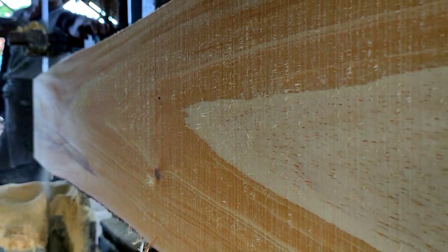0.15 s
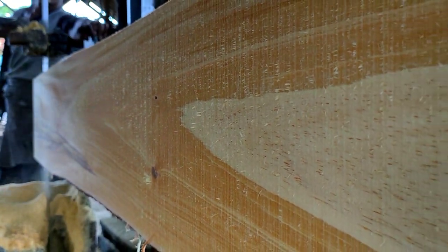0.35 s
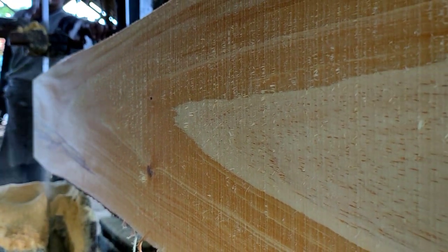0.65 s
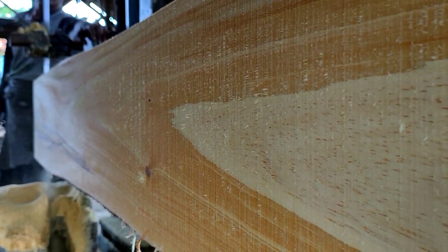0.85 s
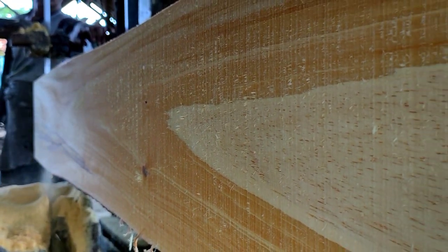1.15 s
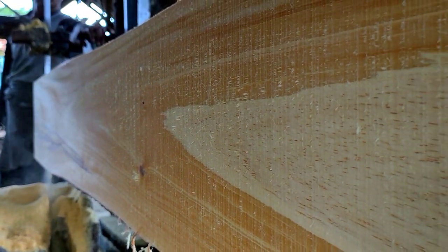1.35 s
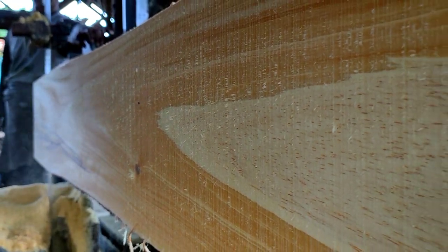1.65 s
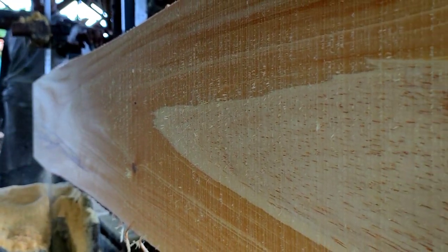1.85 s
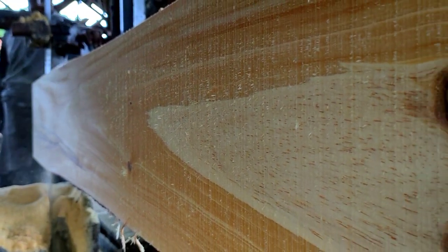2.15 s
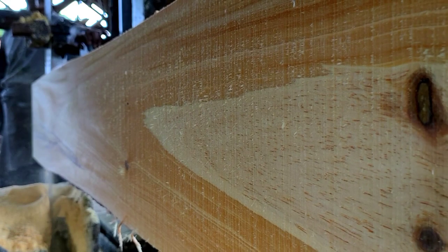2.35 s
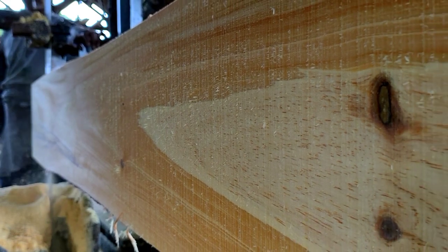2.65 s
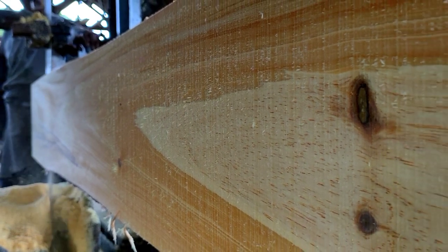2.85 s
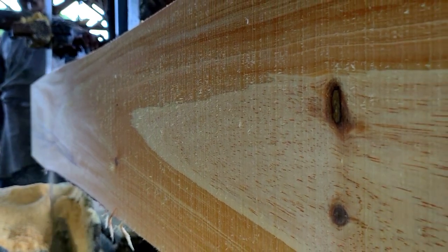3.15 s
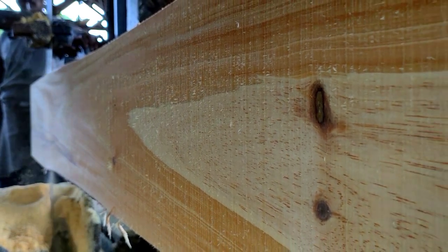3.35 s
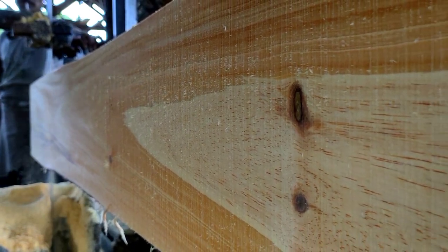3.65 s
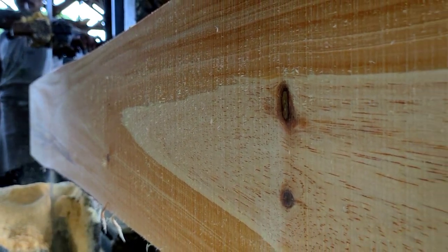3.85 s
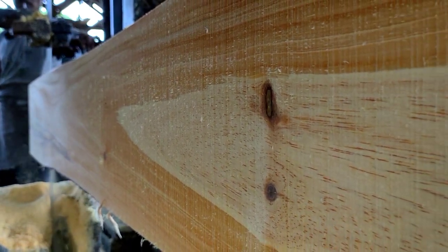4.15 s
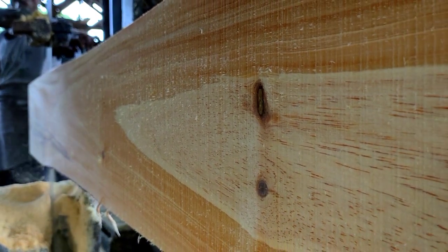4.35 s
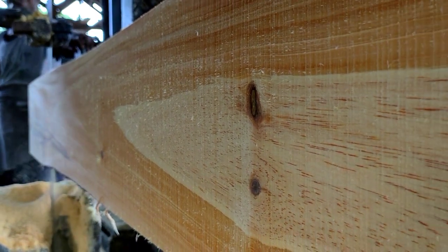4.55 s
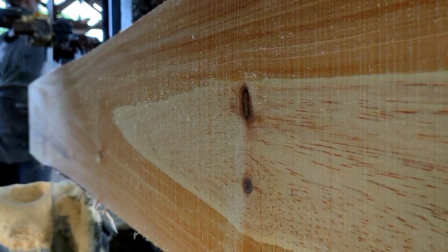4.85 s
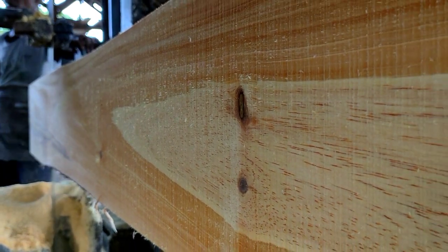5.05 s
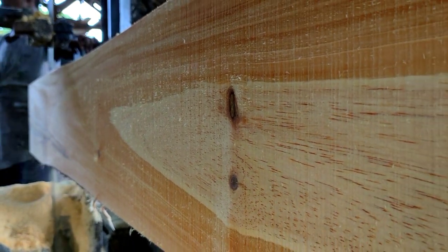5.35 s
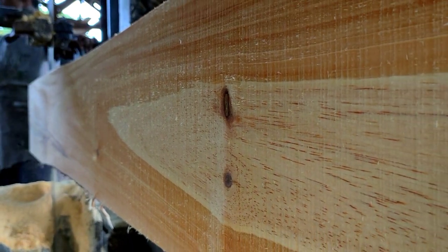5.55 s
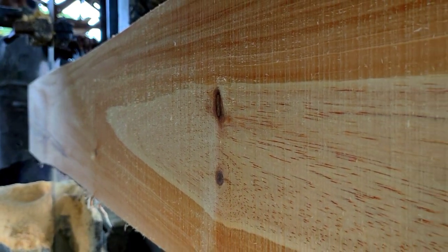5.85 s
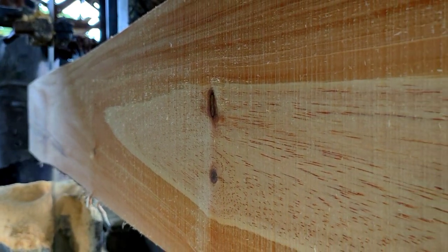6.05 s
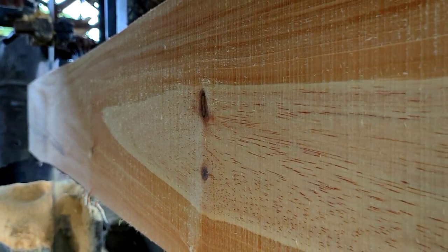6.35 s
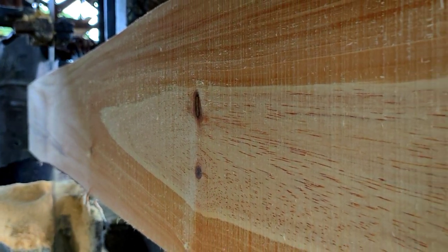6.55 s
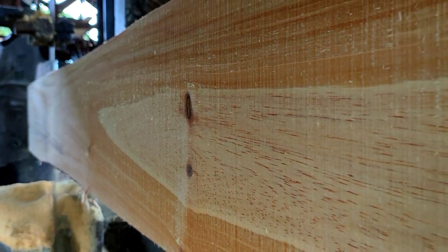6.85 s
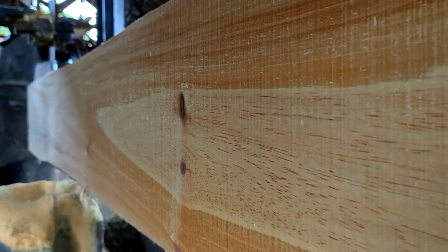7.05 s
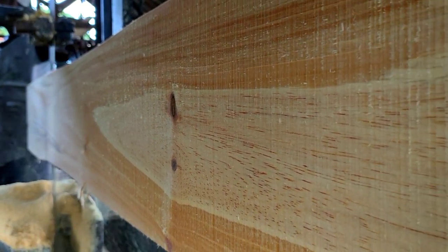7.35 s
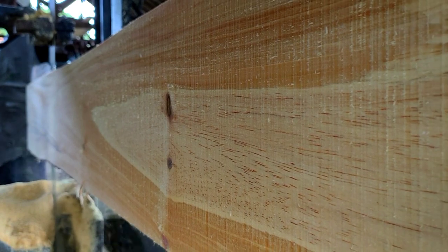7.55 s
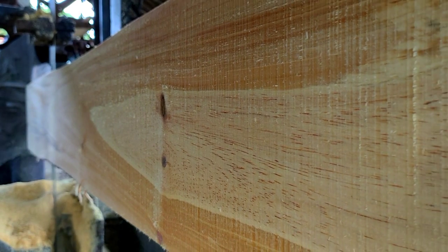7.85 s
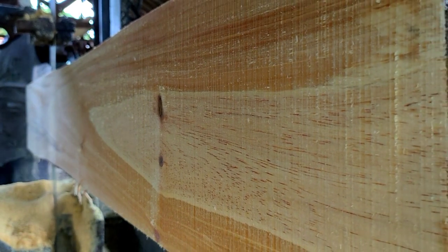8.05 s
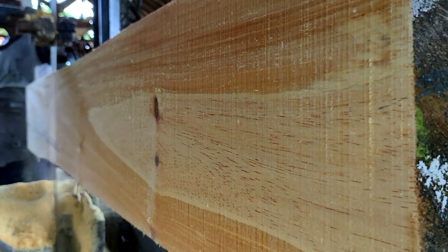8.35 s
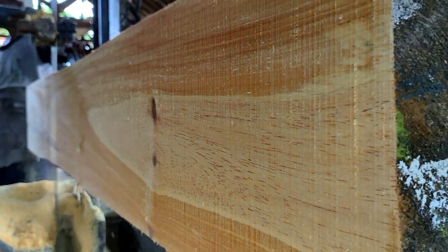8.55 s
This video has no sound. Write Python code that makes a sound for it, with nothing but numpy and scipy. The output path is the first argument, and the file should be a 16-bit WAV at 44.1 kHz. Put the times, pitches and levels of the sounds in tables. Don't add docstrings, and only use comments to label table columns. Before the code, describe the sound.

The machine is already running at 0 s and continues unbroken to the end at about 8.7 s. A one-cylinder engine fires nearly fourteen times a second: a low, boomy exhaust pop and frame thuds, with bursts of metallic clatter, short pings and ringing cover plates in every cycle. Over this lies the constant dry hiss of teeth tearing wood. During the first three seconds the load comes on: flying dust fizzes more, the knocks near each pop grow sharper, and the beat sags, easing to just above twelve per second by the end. A thin high whine appears briefly around 1 and 2.5 s, then about 4 s; a lower tooth tone swells near 3.4 s, strongest around 5.4 s, faint at 7.6 s. From 3 to 7 s some hard pops make the level dip momentarily. Close stereo microphones in an open shed, muffled treble, patchy suppressed highs.

```python
import sys
import numpy as np
from scipy import signal
from scipy.fft import rfft, irfft, next_fast_len
from scipy.io import wavfile
from scipy.ndimage import uniform_filter1d

SR = 44100
rng = np.random.default_rng(int(sys.argv[2]) if len(sys.argv) > 2 else 0)


def to_wav(sig):
    pcm = np.clip(np.atleast_2d(sig), -1, 1) * 32767
    pcm = np.round(pcm).astype(np.int16)
    wavfile.write(sys.argv[1], SR, pcm.T)


def voltage_ratio(decibels):
    exponent = np.asarray(decibels, float) / 20
    return 10 ** exponent


N = 383669

# (time [s], firing rate [1/s])
ENGINE_SPEED = [(0, 13.6887), (.7, 13.3733), (1.8, 13.1165), (3.3, 12.8299), (5, 12.6156), (6.5, 12.4591),
                (7.7, 12.2989), (8.7, 12.2994)]
# (time [s], teeth passing [per cycle])
TEETH_PER_CYCLE = [(0, 40.62), (8.7, 39.9)]
EXHAUST_PUSHES = [((1, 2), .956, .956, -1), ((3, 5, 7), .03, .028, -1), ((4, 6, 8), -.02, .009, -1),
                  ((9, 10, 16), .01, .007, -1), ((11,), .02, .02, 1), ((12, 13, 14, 15), .633, .628, 1),
                  ((17, 18, 19), .177, .177, 1), ((20, 21), .452, .44, 1), ((22, 23, 24), .445, .443, 1),
                  ((25,), .602, .592, 1), (range(26, 31), .587, .59, 1)]
# (multiple of firing rate, level [dB rms])
EXHAUST_TONES = [(1, -58.6), (2, -39.8), (3, -48.9), (4, -40.8), (5, -36.6), (6, -36.3), (7, -30.5),
                 (8, -26.4), (9, -34.4), (10, -33.0), (11, -38.1), (12, -30.5), (13, -37.2), (14, -50.1),
                 (15, -33.5), (16, -38.4), (17, -41.5), (18, -37.6), (19, -39.3), (20, -43.1), (21, -41.6),
                 (22, -44.1), (23, -43.4), (24, -51.8), (25, -52.7), (26, -50.5), (27, -49.9), (28, -54.3),
                 (29, -58.8), (30, -54.1)]
# (frequency [Hz], half width [Hz], gain [dB])
STANDING_WAVES = [(67.1, 3.0, -7.7), (92.6, 5.4, -10.1), (104.2, 3.6, -13.9), (137.3, 3.7, -15.6),
                  (175.1, 3.0, -4.0), (207.8, 9.2, -11.6), (229.8, 3.0, -7.5), (256.6, 4.7, 5.3),
                  (281.6, 8.9, -13.9), (325.3, 25.0, 13.5), (342.2, 10.0, -13.5), (371.0, 25.0, 2.7)]
# (frequency [Hz], level [dB per Hz])
BLOWN_AIR = [(15, -20), (30, -4), (60, -2), (190, 0), (250, 3), (340, 0), (450, -8), (800, -40)]
# (place [cycle 0-1], rise [s], time to fall 60 dB [s])
CLATTER_STROKES = [
    (.68, .002, .03),
    (.69, .003, .26),
    (.83, .002, .05),
    (.96, .002, .038),
    (.98, .003, .26),
    (.962, .0015, .028),
]
# (light load [dB], full load [dB], centre [Hz], fall [dB per octave squared])
STROKE_COLOURS = [
    (-31, -31.5, 2500, 1.2),
    (-32.5, -29.5, 2300, 1.1),
    (-33.5, -33, 1800, 1.5),
    (-37, -21.5, 3200, .8),
    (-41, -32, 3600, 0.8),
    (-33, -29, 1500, 2.5),
]
# (frequency [Hz], time to fall 60 dB [s], left [dB], right [dB], stroke that strikes it [index])
COVER_PLATES = [(727, .05, -48, -44, 0), (735, .09, -44, -39, 2), (727, .14, -48, -44, 3),
                (835, .05, -47, -44, 2), (635, .3, -52, -46, 0), (3230, .028, -44, -46, 3),
                (1600, .03, -49, -52, 3), (2000, .04, -46, -54, 0), (748, .06, -56, -42, 0),
                (785, .06, -49, -43, 2), (420, .06, -50, -50, 2)]
# (place [cycle 0-1], frequency [Hz], light load peak [dB], full load peak [dB], left minus right [dB])
METAL_PINGS = [(.685, 740, -23, -24, -4), (.69, 1000, -27, -28, -3), (.69, 2230, -27, -27.5, -8),
               (.69, 1550, -28, -34, 4), (.735, 1400, -33, -24, 2), (.78, 2900, -27, -30, 2),
               (.835, 738, -24, -23, -3), (.925, 745, -23, -24, -7), (.97, 1560, -32, -23, 4),
               (.96, 3260, -34, -21, 2), (.99, 3020, -25, -25, 0), (.13, 1620, -36, -28, 0),
               (.13, 3200, -36, -28, 0), (.70, 5200, -36, -35, 0)]
# (frequency [Hz], level [dB per Hz])
CUT_COLOUR = [(380, -2.5), (640, -2), (900, -2.1), (1250, -2), (1700, -2.6), (2150, -0.5), (2700, -3),
              (3250, -0.7)]
# (tooth tone [dB], octave [dB])
WHINE_REST_DB = (-51, -55)
# (middle [s], half length [s], octave up [0 or 1], rise [dB])
BLADE_SINGS = [
    (3.4, 1, 0, 8),
    (5.4, 1.1, 0, 11),
    (7.6, 1, 0, 5),
    (1.1, .6, 1, 13),
    (1.9, .4, 1, 3),
    (2.5, .5, 1, 10.5),
    (4.2, 1.1, 1, 9),
]
# (frequency [Hz], share [0-1])
COMMON_LOW = [(100, 1), (330, 0.91), (420, 0.32), (500, 1), (660, .1), (1050, 0.098), (1220, 0.57),
              (1650, 0.56)]
# (frequency [Hz], share [0-1])
COMMON_HIGH = [(1800, 0.25), (2500, 0.09), (2900, 0.27), (3300, 0.39), (3500, 0.28), (5000, 0.074),
               (15000, 0.081)]
# (frequency [Hz], left minus right [dB])
LEFT_RIGHT = [(160, 0), (450, 0.5), (740, -1.5), (1220, 0), (2010, 1.5), (5500, -1), (9080, 2.5),
              (15000, -1.5)]
# (frequency [Hz], gain [dB])
MIC_TREBLE = [(3250, -1), (4700, -4), (4900, -10), (5200, -8), (6500, -16), (8000, -25), (11000, -27.5),
              (15000, -59)]
# (time [s], depth [dB])
LIMITER_DUCKS = [
    (3.21, 1.5),
    (3.6, 2),
    (4.385, 3.5),
    (4.94, 3),
    (5.66, 3),
    (6.61, 3),
    (7.02, 2.5),
    (7.26, 2),
]
# (frequency [Hz], how much weak sound sinks [power], # how rarely a wide patch drops out
THINNING = [(380, 0, 4, 4), (600, .15, 1.6, 1.8), (1250, .25, 1.25, 1.5), (1700, .25, 1.9, 1.8),
            (4750, .3, 1.9, 1.7), (5000, 1, 1, .5), (8000, 1.2, 1.3, .3), (15000, 1.4, 1, .1)]

FIRST_TURN = -.268
LAG_S = 20 / SR
LOAD_FROM_S, LOAD_RISE_S, LOAD_BEND = 0.24, 2.53, 1.5
CLATTER_DB, CLATTER_LOADED_DB = 0, -2.3
DUST_DB, DUST_LOADED_DB, DUST_RISE_S = 3, 6, 0.46
BOOM_HZ, BOOM_HALF_HZ = 246, 11
BOOM_DB, BOOM_LOADED_DB, BOOM_HALF_LOAD_DB = -41.5, -47, 6.5
PING_RISE_S, PING_T60_S, PING_SPREAD_DB = .002, .03, 2
RASP_DB, RASP_S = 1.6, .004
DROP_DB, DROP_EDGE = 40, .35
SIDE_BASS_HZ, SIDE_BASS_RARE = 400, .5


def evened(x):
    return x / np.sqrt(np.mean(x ** 2) + 1e-20)


def smoothed(x, width):
    return uniform_filter1d(uniform_filter1d(x, width), width)


def read(points, hz):
    f, value = np.transpose(points)
    return np.interp(np.log(hz + 1), np.log(f + 1), value)


def by_load(load, light, full):
    return light + load * (full - light)


def engine_and_load():
    t = np.arange(N) / SR
    rate = np.interp(t, *np.transpose(ENGINE_SPEED))
    turns = FIRST_TURN + np.cumsum(rate) / SR
    load = 1 - np.exp(-(np.maximum(t - LOAD_FROM_S, 0) / LOAD_RISE_S) ** LOAD_BEND)
    clatter_db = by_load(load, CLATTER_DB, CLATTER_LOADED_DB)
    dust_db = by_load(load, DUST_DB, DUST_LOADED_DB) - 1.7 * np.exp(-t / DUST_RISE_S)
    tones_db = np.outer(WHINE_REST_DB, np.ones(N))
    for middle, half, octave, db in BLADE_SINGS:
        tones_db[round(octave)] += db * np.exp(-((t - middle) / half) ** 2)
    return turns, rate, load, clatter_db, dust_db, *tones_db


def per_cycle(turns, spread_db):
    draws = rng.standard_normal(130)
    return voltage_ratio(spread_db * np.interp(turns + 2.5, np.arange(130), draws))


def strikes(turns, place):
    count = np.floor(turns - place)
    return np.diff(count, prepend=count[0])


def pair(db_of_hz):
    size = next_fast_len(N)
    hz = np.fft.rfftfreq(size, 1 / SR)
    a, b, c, d = rng.standard_normal((len(hz), 4)).T
    same = np.clip(read(COMMON_LOW + COMMON_HIGH, hz), 0, 1)
    late = np.exp(-2j * np.pi * hz * LAG_S * np.clip((hz - 420) / 200, 0, 1))
    right = a + 1j * b
    left = same * late * right + np.sqrt(1 - same ** 2) * (c + 1j * d)
    tilt = voltage_ratio(read(LEFT_RIGHT, hz) / 2)
    spectra = np.array([left * tilt, right / tilt]) * voltage_ratio(db_of_hz(hz))
    return evened(irfft(spectra, size)[:, :N])


def cut_bass(hz):
    return read(MIC_TREBLE, hz) - 9 * np.maximum(np.log2(420 / (hz + 5)), 0)


def standing_db(hz):
    grid = np.arange(500.)
    gain = sum(db / (1 + ((grid - f) / half) ** 2) for f, half, db in STANDING_WAVES)
    return np.interp(hz, grid, gain)


def shed(x):
    size = next_fast_len(N)
    hz = np.fft.rfftfreq(size, 1 / SR)
    draws = rng.standard_normal((400, 2)).T
    ripple = np.array([np.interp(hz, np.arange(400) * 41.0, one) for one in draws])
    return irfft(rfft(x, size) * voltage_ratio(1.3 * ripple * (hz > 900)), size)[:, :N]


def tooth_whine(turns, tones_db):
    teeth = np.interp(np.arange(N) / SR, *np.transpose(TEETH_PER_CYCLE))
    passed = np.cumsum(np.gradient(turns) * teeth)
    wander = evened(smoothed(rng.standard_normal((2, 2, N)), 7000))
    whine = np.zeros(N)
    for k, db, (phase_drift, level_drift) in zip((1, 2), tones_db, wander[:, ::-1].transpose(0, 1, 2)):
        pass
    for k, db, w in zip((1, 2), tones_db, wander):
        whine = whine + np.sqrt(2) * voltage_ratio(db + 2.2 * w) * np.cos(2 * np.pi * k * passed + 0.12 * w[::-1])
    return whine


def blade(turns, dust_db, *tones_db):
    hiss = voltage_ratio(-22.5) * pair(lambda hz: read(CUT_COLOUR, hz) + cut_bass(hz))
    fizz_db = -56.0 + 2.0 * dust_db + 1.2 * np.cos(2 * np.pi * (turns - .9))
    fizz = voltage_ratio(fizz_db) * pair(lambda hz: -8 * np.log2((hz + 30) / 11000) ** 2)
    whine = tooth_whine(turns, tones_db)
    return hiss * per_cycle(turns, 0.85) + fizz * per_cycle(turns, 2.8) + whine


def pings(turns, load):
    out, t = np.zeros((2, N)), np.arange(2000) / SR
    envelope = 2 * voltage_ratio(-60 * t / PING_T60_S) * (1 - np.exp(-t / PING_RISE_S))
    for place, hz, light_db, full_db, lean_db in METAL_PINGS:
        level = voltage_ratio(by_load(load, light_db, full_db))
        hit = strikes(turns, place) * level * per_cycle(turns, PING_SPREAD_DB)
        sound = signal.oaconvolve(hit, envelope * np.sin(2 * np.pi * hz * t))[:N]
        late = np.roll(sound, round(LAG_S * SR))
        out += voltage_ratio(np.array([[lean_db], [-lean_db]]) / 2) * np.array([late, sound])
    return out


def plates(hits):
    out, t = np.zeros((2, N)), np.arange(9000) / SR
    for hz, t60, left_db, right_db, stroke in COVER_PLATES:
        hit, shape = hits[round(stroke)]
        scrape = signal.oaconvolve(hit, shape)[:N] * rng.standard_normal(N)
        ring = voltage_ratio(-60 * t / t60) * np.sin(2 * np.pi * hz * t) * (1 - np.exp(-t / 0.0045))
        alike = evened(signal.oaconvolve(hit, ring)[:N])
        loose = evened(signal.oaconvolve(scrape, ring)[:N])
        sound = evened(2.2 * alike + loose)
        out += voltage_ratio(np.array([[left_db], [right_db]])) * np.array([-sound, sound])
    return out


def clatter(turns, load):
    out, t, hits = np.zeros((2, N)), np.arange(9000) / SR, []
    flicker = evened(smoothed(rng.standard_normal(N), round(RASP_S * SR)))
    rasp = voltage_ratio(RASP_DB * flicker)
    for (place, rise, t60), colour in zip(CLATTER_STROKES, STROKE_COLOURS):
        light_db, full_db, centre_hz, fall_db = colour
        hit = strikes(turns, place) * voltage_ratio(by_load(load, light_db, full_db)) * per_cycle(turns, 1.4)
        shape = voltage_ratio(-60 * t / t60) * (1 - np.exp(-t / rise)) ** 2
        noise = pair(lambda hz: read(CUT_COLOUR, hz) + cut_bass(hz)
                     - fall_db * np.log2((hz + 30) / centre_hz) ** 2)
        out += voltage_ratio(11.5) * noise * rasp * signal.oaconvolve(hit, shape)[:N]
        hits.append((hit, shape))
    return out + plates(hits)


def exhaust_air(load):
    boom_db = by_load(load, BOOM_DB, BOOM_LOADED_DB) + 4.5 * load * (1 - load) * BOOM_HALF_LOAD_DB
    boom = pair(lambda hz: -20 * np.log10(1 + ((hz - BOOM_HZ) / BOOM_HALF_HZ) ** 2))
    return voltage_ratio(boom_db) * boom + voltage_ratio(-39) * pair(lambda hz: read(BLOWN_AIR, hz))


def exhaust(turns, rate, load):
    out = np.zeros((2, N))
    for multiples, light_place, full_place, sign in EXHAUST_PUSHES:
        place = np.interp(load, [0, .6], [light_place, full_place])
        strength = sign * np.sqrt(2) * per_cycle(turns, 0.55)
        for k in multiples:
            angle = 2 * np.pi * k * (turns - place)
            skew = .08 * rng.choice([-1, 1]) * np.array([[1], [-1]])
            level = strength * voltage_ratio(EXHAUST_TONES[k - 1][1] + standing_db(k * rate))
            out += level * (np.cos(angle) + skew * np.sin(angle))
    return out + exhaust_air(load)


def scene():
    turns, rate, load, clatter_db, *cut = engine_and_load()
    machine = clatter(turns, load) + pings(turns, load) + blade(turns, *cut)
    return exhaust(turns, rate, load) + voltage_ratio(clatter_db) * shed(machine)


def limiter(x):
    t = np.arange(N) / SR
    duck_db = np.zeros(N)
    for start, db in LIMITER_DUCKS:
        duck_db += db * np.clip((t - start) / 0.011, 0, 1) * np.exp(-np.maximum(t - start, 0) / 0.044)
    return x / voltage_ratio(duck_db)


def dropouts(band, frames, span, rare):
    patches = rng.standard_normal((frames, band[-1] + 1, 2))[:, band].T
    chance = evened(uniform_filter1d(patches, size=span, axis=2))
    return voltage_ratio(-DROP_DB * np.clip((chance - rare[..., None]) / DROP_EDGE, 0, 1))


def thin_out(x):
    middle_side = np.array([x[0] + x[1], x[0] - x[1]]) / 2
    hz, t, z = signal.stft(middle_side, SR, nperseg=2048, noverlap=1536)
    points, *columns = np.transpose(THINNING)
    sink, wide, thin = (np.interp(hz, points, column) for column in columns)
    size = abs(z) + 1e-9
    lift = (size / uniform_filter1d(size, size=25, axis=1)) ** sink[:, None]
    wide = np.array([wide, np.where(hz < SIDE_BASS_HZ, SIDE_BASS_RARE, wide)])
    wide_bands = (22 * np.log(1 + hz / 1500)).astype(int)
    thin_bands = np.arange(len(hz)) // 4
    z = z * lift * dropouts(wide_bands, len(t), 6, wide) * dropouts(thin_bands, len(t), 5, thin)
    total, difference = signal.istft(z, SR, nperseg=2048, noverlap=1536)[1][:, :N]
    return np.array([total + difference, total - difference])


def top_cut(x):
    return signal.sosfilt(signal.butter(12, 15630, fs=SR, output="sos"), x)


def record(dry):
    mix = thin_out(limiter(dry))
    return top_cut(mix)


dry = scene()
out = record(dry)
to_wav(out)
```